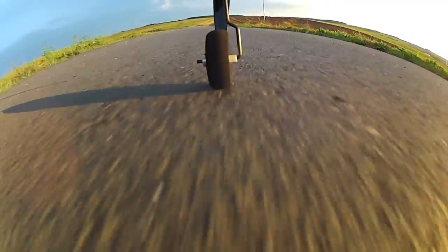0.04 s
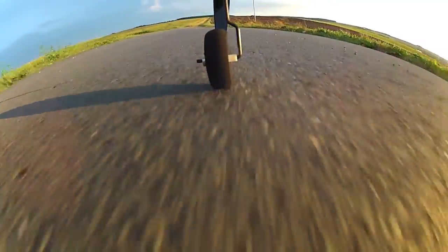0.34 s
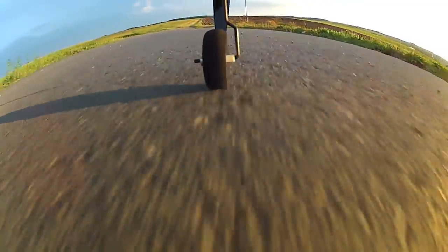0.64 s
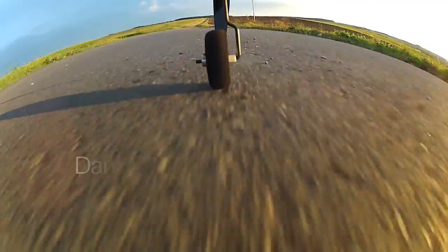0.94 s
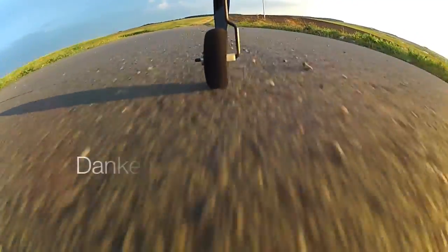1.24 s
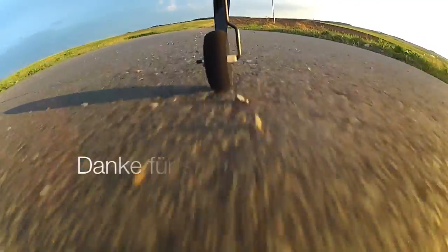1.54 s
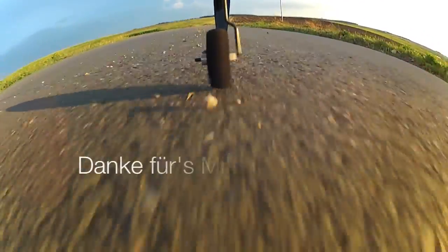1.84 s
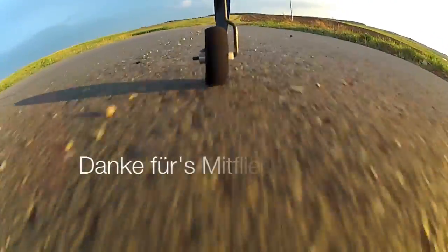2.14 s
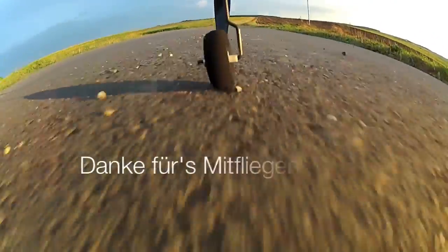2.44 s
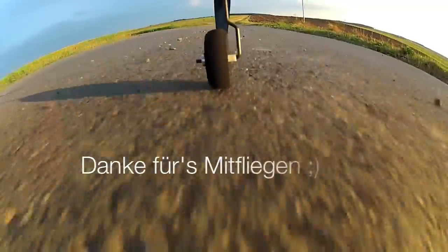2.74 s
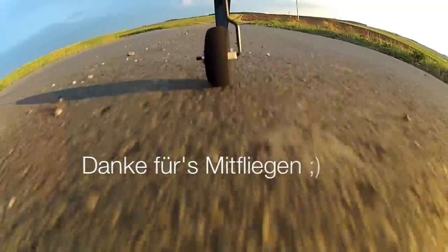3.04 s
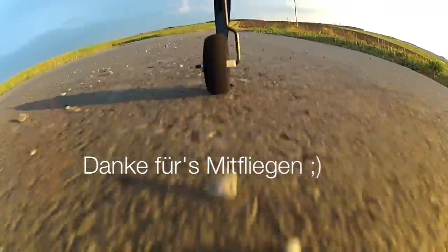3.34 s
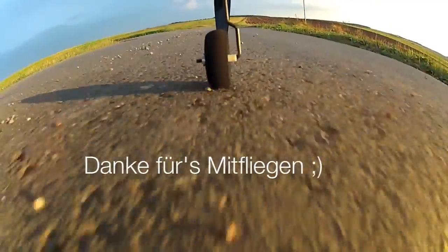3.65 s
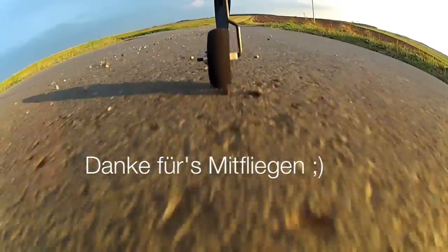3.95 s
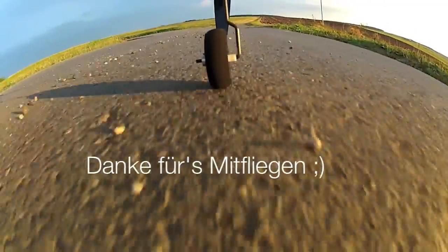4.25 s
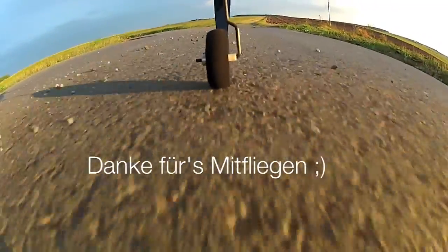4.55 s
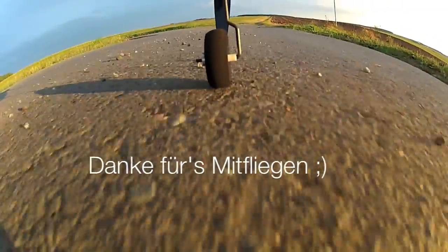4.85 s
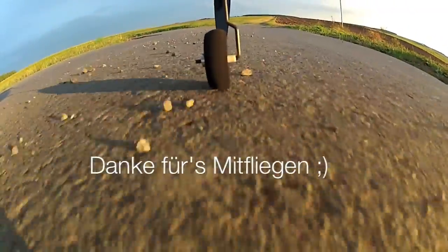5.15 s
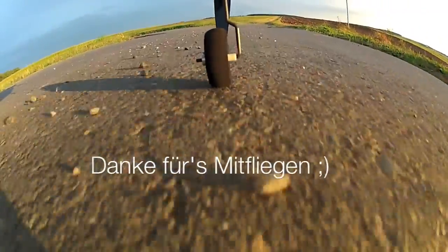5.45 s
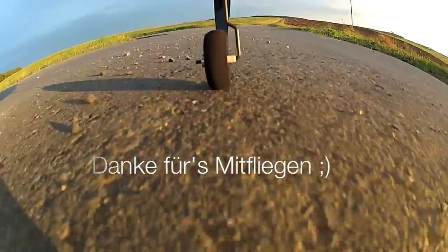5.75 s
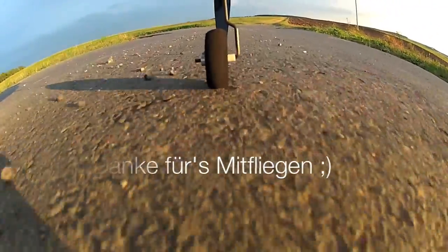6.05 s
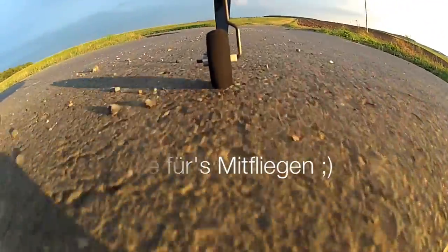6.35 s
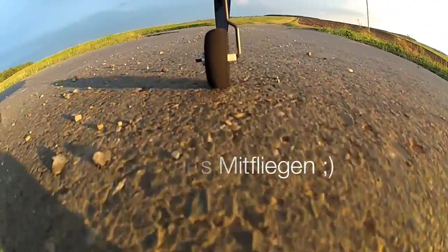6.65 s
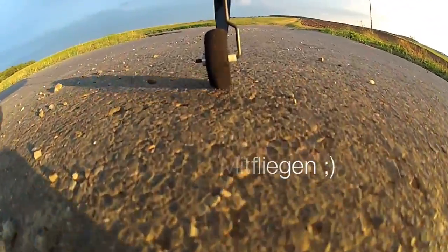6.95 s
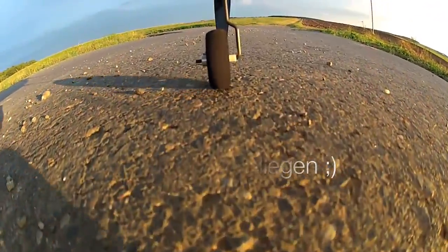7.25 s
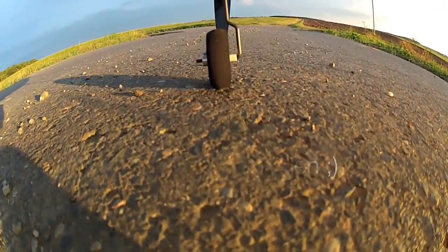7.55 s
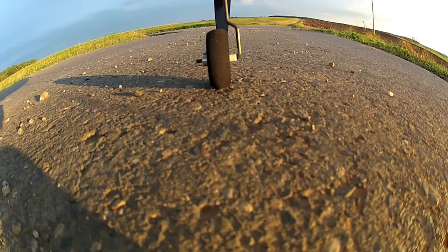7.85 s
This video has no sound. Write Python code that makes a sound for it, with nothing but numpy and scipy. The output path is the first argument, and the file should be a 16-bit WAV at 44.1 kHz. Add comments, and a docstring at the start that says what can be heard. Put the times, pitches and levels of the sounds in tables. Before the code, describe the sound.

Close rumble of a small plane rolling on gritty asphalt, its landing gear knocking and rattling, fading until only a faint buzz remains.

```python
"""A model plane rolls out over rough asphalt and stops, heard by a camera just behind its nose wheel.
Road stones drum on the hollow airframe, bumps thud and shake the landing gear into clatter,
the strut knocks and grit ticks against the gear. The steering servo's teeth whirr in short runs and
buzz while it holds still; that buzz and faint outdoor air are left when the plane stands."""
import sys
import numpy as np
from scipy import signal
from scipy.fft import rfft, irfft
from scipy.io import wavfile

SR = 44100
rng = np.random.default_rng(int(sys.argv[2]) if len(sys.argv) > 2 else 0)


def master(y):
    """Save y as 16-bit WAV."""
    cut = np.clip(np.atleast_2d(y).T, -1, 1)
    pcm = np.round(cut * 32767)  # scale
    wavfile.write(sys.argv[1], SR, pcm.astype(np.int16))


N = 352800
TIME = np.arange(N) / SR

# Light air over the fields. Each row: frequency in Hz, relative level in dB.
AIR_SPECTRUM = [(20, -13), (44, -2.5), (290, -6.5), (620, -16), (1500, -22.5), (5000, -32), (15000, -37)]
# Hum of the holding servo. Each row: multiple of the control frame rate, level in dB.
HUM_PARTIALS = [(2, -65.5), (4, -77), (10, -82), (17, -80), (18, -80), (19, -80), (20, -83), (23, -87),
                (38, -86), (39, -89), (40, -88), (90, -88), (110, -89)]
# Ring of the servo case. Each row: pitch in Hz, width in Hz, relative level in dB.
CASE_MODES = [(860, 1700, -4.5), (1700, 320, -2.5), (2800, 880, -6), (5030, 1020, -3)]
# Whine of the servo gears. Each row: multiple of the tooth rate, relative level in dB.
WHINE_PARTIALS = [(1, -5), (2, 0), (3, -7)]
# Steering runs. Each row: start in seconds, length in seconds, level in dB, settled tooth rate in Hz.
STEERING_RUNS = [(0.582, 0.054, -53, 620), (1.144, 0.061, -50.5, 610), (1.762, 0.17, -46.5, 613),
                 (2.169, 0.2, -43.5, 1480), (2.527, 0.046, -42, 1120), (3.097, 0.11, -50.5, 561),
                 (5.145, 0.17, -50, 567), (5.332, 0.059, -46.5, 1000), (5.37, 0.07, -51, 1450),
                 (5.791, 0.08, -55, 512), (5.855, 0.17, -43.5, 556), (6.057, 0.05, -43, 1100),
                 (6.092, 0.09, -44, 1440)]
# Tone of a hard contact on the landing gear. Each row: frequency in Hz, relative level in dB.
CRACK_SPECTRUM = [(310, -22), (820, 5.9), (2750, 3.5), (3750, -1.5), (5050, -1.5), (7050, -12.5)]
# Ring of the landing gear and its mount. Each row: pitch in Hz, width in Hz, relative level in dB.
GEAR_MODES = [(580, 123, 3.5), (655, 48, 7.5), (769, 60, 5.5), (861, 28, 5.5), (990, 290, -6.5),
              (1218, 21.5, -3.5), (1630, 70, -4)]
# Stones that snap from under the tyre or strike the gear. Each row: start in seconds, strength in dB.
STONE_HITS = [(0.112, -19.5), (0.6812, -17), (0.909, -19), (1.203, -20), (1.2661, -8), (1.3394, -25),
              (1.4267, -17), (1.523, -17), (1.6869, -5.5), (1.7219, -5.5), (1.7269, -8.5), (1.8015, -13.5),
              (1.8752, -20), (1.8883, -10.5), (1.8995, -8.5), (1.911, -8.5), (1.919, -8), (1.9394, -13),
              (1.948, -12), (1.9949, -16), (2.011, -9.5), (2.038, -10.5), (2.108, -15.5), (2.132, -15),
              (2.357, -20), (2.7703, -21.5), (2.835, -28), (2.9514, -11), (3.013, -11.5), (3.0208, -8),
              (3.2695, -20), (3.3195, -7.5), (3.3508, -15.5), (3.44, -19.5), (3.7335, -23.5),
              (4.005, -14.5), (4.1317, -28.5), (4.3186, -25), (4.4717, -30), (4.854, -27), (5.018, -30.5),
              (5.8634, -26.5), (5.9275, -13.5), (6.468, -28)]
# Ring of the wheel strut. Each row: multiple of its pitch, width in Hz, relative level in dB.
STRUT_MODES = [(1, 34.3, 5.5), (2.02, 60, -18)]
# Hollow knocks of the strut. Each row: start in seconds, peak level in dB, pitch in Hz.
STRUT_KNOCKS = [(0.191, -35, 602), (0.67, -33, 840), (0.712, -27, 810), (0.805, -29.5, 800),
                (0.877, -34, 720), (0.909, -26, 785), (1.335, -24.5, 779), (1.427, -25.5, 787),
                (1.505, -27, 794), (1.524, -24.5, 818), (1.612, -30, 807), (1.826, -26.5, 783),
                (2.02, -19, 785), (2.057, -22.5, 816), (2.135, -29, 783), (2.241, -24, 775),
                (2.873, -36, 844)]
# Hollow ring of the tyre. Each row: pitch in Hz, width in Hz, relative level in dB.
TYRE_MODES = [(152, 14, -12), (247, 9, 0), (318, 16, -11)]
# Boom of the hollow airframe. Each row: pitch in Hz, width in Hz, relative level in dB.
AIRFRAME_MODES = [(90.4, 4.6, 2), (142.7, 32.6, 1.5), (198, 28, -21), (207.2, 9.8, -2), (242.7, 30, 4.5),
                  (286.3, 42, 4.5), (335.3, 101, 3), (411.6, 34.5, 0.5), (459.7, 44.3, -2.5)]
# Bumps under the wheel. Each row: start in seconds, length in seconds, thud strength in dB,
# clatter in dB relative to that strength.
ROAD_BUMPS = [(0.637, 0.052, -31, -12.5), (0.713, 0.028, -27.5, -6), (0.805, 0.013, -29.5, -5.5),
              (0.864, 0.049, -31.5, -22), (1.227, 0.053, -27.5, -10), (1.331, 0.0092, -26, -10),
              (1.502, 0.04, -27.5, -7.5), (1.594, 0.028, -29, -7), (1.682, 0.065, -17.5, -7.5),
              (1.814, 0.027, -25, -8), (1.868, 0.059, -18, -11.5), (1.928, .036, -23.5, -7),
              (2.008, 0.058, -24, -5.5), (2.13, 0.037, -24.5, -4.5), (2.21, 0.055, -29.5, -8.5),
              (2.349, 0.018, -30, -6), (2.454, 0.0057, -24.5, -25), (2.787, 0.028, -36, -4),
              (2.833, 0.0091, -29.5, -3), (2.947, .011, -20.5, -18.5), (3.011, 0.01956, -15, -17),
              (3.21, 0.028, -32, -10.5), (3.299, 0.052, -19, -9.5), (3.353, 0.012, -21, -13),
              (3.428, 0.02, -26, -9), (3.546, .02, -37.5, -16), (3.979, 0.059, -31, -11),
              (4.113, .015, -39, -16), (4.562, .012, -43, -22), (4.751, 0.021, -41, -17),
              (4.839, 0.051, -40, -11.5), (5.053, 0.046, -41, -15.5), (5.208, 0.043, -40, -13),
              (5.429, 0.034, -41, -14.5), (5.802, 0.017, -41, -12), (6.171, 0.032, -39, -18),
              (6.442, 0.068, -51, -9), (6.825, 0.041, -55, -5), (6.989, 0.065, -58, -12)]
# The camera's filter ahead of its sampling. Each row: frequency in Hz, gain in dB.
CAMERA_EQ = [(2000, -2.5), (5150, 0), (5660, -2), (6000, -10)]

SERVO_FRAME_HZ = 45.46  # rate of the servo's control kicks
STONE_LOW_HZ, STONE_HIGH_HZ = 800, 2200  # pitch range of flying stones
STOP_S = 7.84  # the plane slows evenly until this time
GRAVEL_S, GRAVEL_HALF_S = 2.65, 1  # middle and half length of a stretch of loose gravel


def undb(db):
    """Decibels to gain."""
    return 10 ** (np.asarray(db) / 20)


def unit(x):
    """Scale to an energy of one."""
    return x / np.sqrt(np.sum(x ** 2) + 1e-18)


def level(x, db):
    """Scale to an rms level."""
    return unit(x) * np.sqrt(len(x)) * undb(db)


def add(track, s, sound):
    """Mix a sound in at s seconds."""
    start = max(int(s * SR), 0)
    track[start:start + len(sound)] += sound[:max(N - start, 0)]


def through(x, response):
    """Pass a sound through an impulse response."""
    return signal.fftconvolve(x, response)[:len(x)]


def ring(modes, size=8192):
    """Response of a struck body: decaying modes, neighbours in opposite phase."""
    t = np.arange(size) / SR
    return unit(sum((-1) ** k * undb(db) * width * np.exp(-np.pi * width * t) * np.sin(2 * np.pi * hz * t)
                    for k, (hz, width, db) in enumerate(modes)))


def colour(points, size=4096):
    """Minimum-phase response with the given spectrum."""
    hz, db = np.transpose(points)
    bins = np.maximum(np.fft.rfftfreq(size, 1 / SR), 1)
    gain = undb(np.interp(np.log(bins), np.log(hz), db))
    cepstrum = irfft(np.log(gain))
    cepstrum[1:size // 2] *= 2
    cepstrum[size // 2 + 1:] = 0
    return irfft(np.exp(rfft(cepstrum)))


def walk(rate_hz):
    """Random drift with a spread near one."""
    knots = rng.standard_normal(N)
    return np.interp(TIME * rate_hz, np.arange(N), knots)


def grains(rate_hz, spread_db):
    """Random impacts of uneven size, rms one."""
    hit = rng.random(N) < rate_hz / SR
    size = undb(spread_db * np.clip(rng.standard_normal(N), -2, 2))
    return level(hit * size * rng.choice([-1, 1], N), 0)


def contact(tail_db, t60_s, size=2048):
    """A hard tick: a crack and the brief scatter that follows it in the gear."""
    decay = np.exp(-np.log(1000) * np.arange(size) / SR / t60_s)
    tick = undb(tail_db) * unit(rng.standard_normal(size) * decay)
    tick[0] += 1
    return unit(through(tick, colour(CRACK_SPECTRUM)))


def pings(blows, low_hz, high_hz, width_hz=90):
    """Every struck stone rings briefly at a random pitch of its own."""
    out = np.zeros(N)
    pitch_hz = low_hz * (high_hz / low_hz) ** rng.random(N)
    for i in np.flatnonzero(blows):
        add(out, i / SR, blows[i] * ring([(pitch_hz[i], width_hz, 0)], size=1024))
    return out


def air():
    """A faint, wavering bed of outdoor air."""
    rush = through(rng.standard_normal(N), colour(AIR_SPECTRUM))
    return level(rush * undb(2.3 * walk(15)), db=-65)


def servo_case(slack, rattle_hz=4093):
    """Response of the servo case; slack teeth also set a narrow rattle ringing."""
    rattle = slack * undb(-1) * ring([(rattle_hz, 150, 0)])
    return unit(ring(CASE_MODES) + rattle)


def servo_hold():
    """The holding servo gets a short kick every control frame: a hum, and a rustle of the teeth."""
    phase = TIME * SERVO_FRAME_HZ % 1 - .5
    hum = sum(undb(db) * np.sqrt(2) * np.cos(2 * np.pi * k * phase) for k, db in HUM_PARTIALS)
    # the teeth rock through nearly the same contacts each time
    backlash = rng.standard_normal(1024)
    repeating = np.interp(phase, np.linspace(-.5, .5, len(backlash)), backlash)
    kick = np.exp(-np.abs(phase) / .22)
    drive = kick * (repeating + undb(-2) * rng.standard_normal(N))
    case_buzz = level(through(drive, servo_case(slack=.25)), db=-75.5)
    rustle = level(through(drive, ring([(2130, 3300, 0)])), db=-78)
    return hum + case_buzz + rustle


def servo_runs(hunt_hz=9.5, settle_s=.07):
    """Teeth click into the case: a slow run is kicked every control frame and rasps, a fast one whines."""
    out = np.zeros(N)
    grip = undb(5 * walk(130))  # the whine comes in scraps as the teeth grip and slip
    wobble, uneven = walk(600), undb(3 * walk(1100))
    rasp = grains(900, spread_db=4)
    kick = -np.cos(2 * np.pi * SERVO_FRAME_HZ * TIME)
    drag, snag = walk(45), walk(110)
    for s, length, db, settled_hz in STEERING_RUNS:
        span = slice(int(s * SR), int((s + length) * SR))
        t = TIME[span] - s
        # the motor starts slow and overshoots its speed before it settles
        hunt = .06 * np.exp(-t / settle_s) * np.cos(2 * np.pi * hunt_hz * t)
        tooth_hz = settled_hz * (1 - hunt + .025 * drag[span])
        slack = np.clip(1 - settled_hz / 1560, 0, 1)
        jitter = (.035 + .2 * slack) * wobble[span]
        tooth_phase = np.cumsum(tooth_hz * (1 + jitter)) / SR
        clicks = np.sinc((tooth_phase % 1 - .5) * SR / tooth_hz) * uneven[span]
        mesh = level(clicks - clicks.mean(), 0) + 1.4 * rasp[span]
        swell = np.sin(np.pi * np.linspace(0, 1, len(t)) ** .75).clip(0) ** 1.4
        effort = swell * undb(3.5 * slack * kick[span] + 2.8 * snag[span])
        whirr = signal.fftconvolve(mesh * effort, servo_case(slack))
        whine = sum(undb(tone_db) * np.sin(2 * np.pi * k * tooth_phase) for k, tone_db in WHINE_PARTIALS)
        whine_share = .33 * (1 - slack) ** 2
        gain = undb(db) * np.sqrt(len(t))
        add(out, s, gain * np.sqrt(1 - whine_share) * unit(whirr))
        add(out, s, gain * np.sqrt(whine_share) * unit(whine * effort * grip[span]))
    return out


def grit_spray(decay_s=.043):
    """Each bump throws up grit that patters on the gear for a moment."""
    thrown = np.zeros(N)
    fading = np.exp(-np.arange(SR // 2) / SR / decay_s)
    for s, length, thud_db, _ in ROAD_BUMPS:
        add(thrown, s + length, undb(thud_db - 25) * fading)
    blows = thrown * grains(150, spread_db=8.5)
    stones = pings(blows, STONE_LOW_HZ, STONE_HIGH_HZ)
    patter = through(blows, contact(tail_db=3, t60_s=.051))
    return undb(-2) * (patter + stones) + undb(5) * through(blows, ring(GEAR_MODES))


def stone_ticks():
    """A stone cracks against the gear, rings it, knocks on the airframe and sounds its own short note."""
    cracks, blows = np.zeros(N), np.zeros(N)
    for s, db in STONE_HITS:
        add(blows, s, undb([db]))
        add(cracks, s, undb(db + 3.5) * contact(tail_db=-2, t60_s=.019))
    body = through(blows, ring(GEAR_MODES)) + undb(-1) * through(blows, ring(AIRFRAME_MODES))
    return cracks + body + undb(-5) * pings(blows, STONE_LOW_HZ, STONE_HIGH_HZ)


def strut_knocks(attack_s=.0007):
    """The strut knocks in its bearing: a hollow note that swells for an instant and dies away."""
    out = np.zeros(N)
    for s, db, pitch_hz in STRUT_KNOCKS:
        note = ring([(multiple * pitch_hz, width, mode_db) for multiple, width, mode_db in STRUT_MODES])
        note *= 1 - np.exp(-np.arange(len(note)) / SR / attack_s)
        add(out, s, undb(db) * note / np.abs(note).max())
    return out


def leg_bounce(bounce_hz=52.3, width_hz=20):
    """The low end: the plane's weight swings on the springy leg, and that on the soft tyre."""
    spring = ring([(bounce_hz, width_hz, 0)])
    return unit(through(spring, spring))


def bumps(judder_hz=110, judder_db=4):
    """Each bump thuds in the airframe, swings the leg and clatters the gear; the tyre rings on."""
    out, tyre_rings = np.zeros(N), np.zeros(N)
    soft, hard = grains(1400, spread_db=2.3), grains(2000, spread_db=4)
    leg, gear, tyre = leg_bounce(), ring(GEAR_MODES), ring(TYRE_MODES)
    crack = contact(tail_db=-9.5, t60_s=.014)
    for s, length, thud_db, clatter_db in ROAD_BUMPS:
        span = slice(int(s * SR), int((s + length) * SR))
        press = np.linspace(1, .6, span.stop - span.start)
        push = press * soft[span]
        knocks = unit(press * hard[span])
        knocks[0] += .25  # a first knock sharpens the attack
        # a gentle blow, cushioned by the tyre, rings mostly the low modes; a hard one is brighter
        cushion_db = np.clip(-.22 * (thud_db + 31) - .55 * (clatter_db + 10), -4, 7)  # per octave
        corner_hz = 310 if cushion_db > 0 else 120
        frame = ring([(hz, width, db - cushion_db * np.log2(max(hz, corner_hz)))
                      for hz, width, db in AIRFRAME_MODES])
        knock_db = thud_db + clatter_db
        swing_db = thud_db - 4 + 20 * np.log10(length / .096)  # short bumps swing the leg less
        tyre_db = thud_db - 8.5 - .85 * (clatter_db + 12)  # a blow goes into the tyre or into the gear
        layers = ((push, frame, thud_db - 2.6), (push, leg, swing_db),
                  (knocks, gear, knock_db), (knocks, crack, knock_db - 10))
        length_gain = np.sqrt(len(press))
        for force, body, db in layers:
            add(out, s, undb(db) * length_gain * unit(signal.fftconvolve(force, body)))
        add(tyre_rings, s + length, undb(tyre_db) * length_gain * tyre)
    judder = undb(judder_db * walk(judder_hz))  # the road roughens the tyre's ring
    return out + tyre_rings * judder


def rolling():
    """The tyre drums over stone after stone, harder on the gravel, fading as the plane slows."""
    speed = np.clip(1 - TIME / STOP_S, 0, 1)
    gravel = np.exp(-((TIME - GRAVEL_S) / GRAVEL_HALF_S) ** 2)
    patch_db = 2 * (1 - speed) * walk(24)  # the slower the wheel, the lumpier the rumble
    load = speed ** 2.043 * undb(-30.5 + 1.5 * gravel + patch_db)
    sway = speed ** 1.28 * undb(-39 + 3 * gravel)
    drum = through(load * grains(620, spread_db=3.5), ring(AIRFRAME_MODES))
    # pebbles pressed under the tyre sound lower than flying stones
    pebbles = pings(load * grains(120, spread_db=3), low_hz=450, high_hz=1200)
    crunch = sum(through(load * grains(910, spread_db=-1.5), contact(tail_db=1, t60_s=.0073))
                 for _ in range(3))
    knocks = through(load * grains(22, spread_db=3), ring(GEAR_MODES))
    grit = through(load * grains(18, spread_db=3), contact(tail_db=-4, t60_s=.014))
    bounce = through(sway * grains(700, spread_db=2.5), leg_bounce())
    texture = undb(-18.5) * pebbles + undb(-29) * crunch + undb(-16.5) * knocks + undb(-27) * grit
    return undb(-1.25) * drum + bounce + texture


def scene():
    """Wheel, servo and air in one close mono mix, without any echo."""
    wheel = rolling() + bumps() + strut_knocks() + grit_spray() + stone_ticks()
    return (wheel + servo_runs() + servo_hold() + air())[None]


def record(dry, sample_hz=12000, top_hz=15300):
    """The camera filters the sound and holds each coarse sample, mirroring it into a treble sizzle."""
    filtered = through(dry[0], colour(CAMERA_EQ))
    samples = signal.resample(filtered, N * sample_hz // SR)
    steps = signal.resample(np.repeat(samples, 4), N)
    high_cut = signal.ellip(8, .2, 70, top_hz, fs=SR, output="sos")
    return signal.sosfilt(high_cut, steps)[None]


dry = scene()
out = record(dry)
master(out)
```